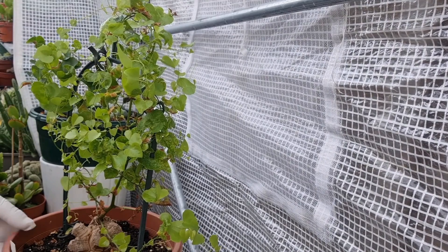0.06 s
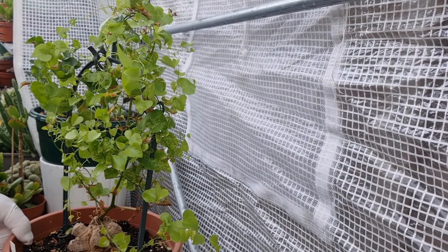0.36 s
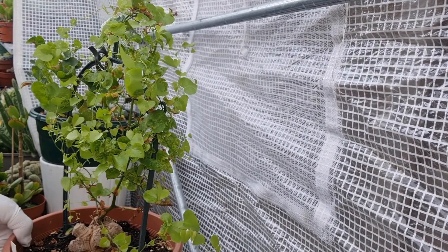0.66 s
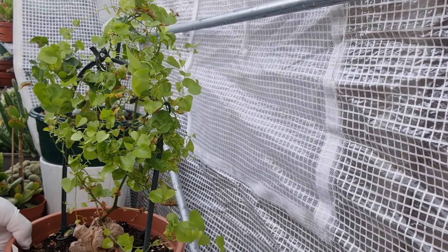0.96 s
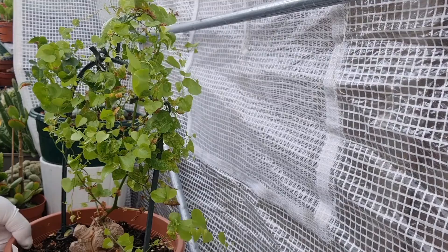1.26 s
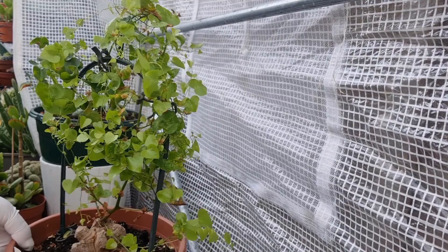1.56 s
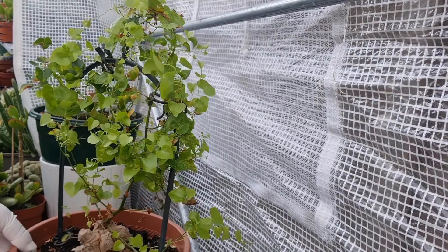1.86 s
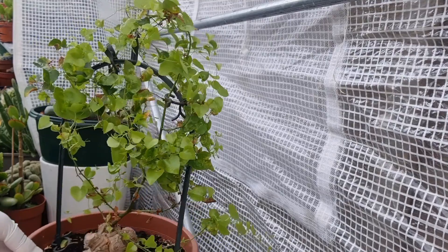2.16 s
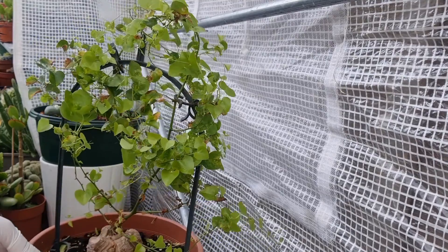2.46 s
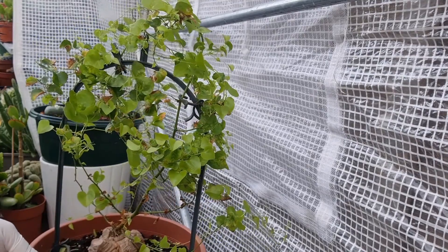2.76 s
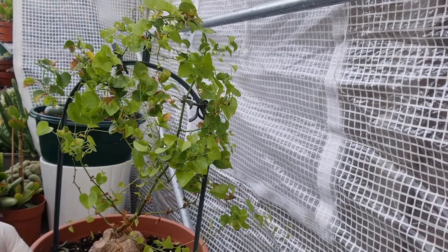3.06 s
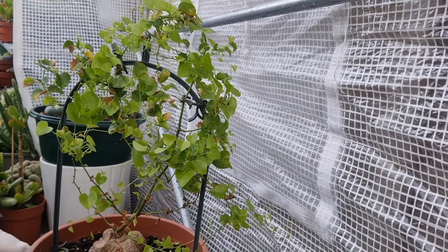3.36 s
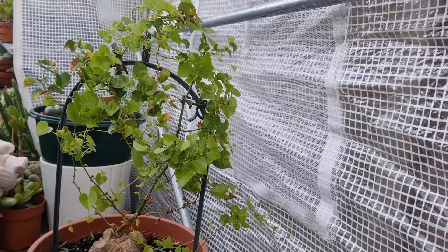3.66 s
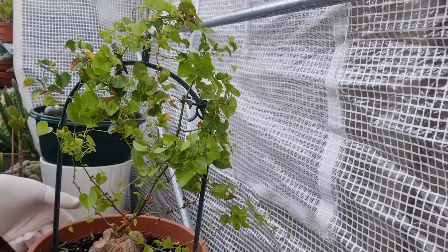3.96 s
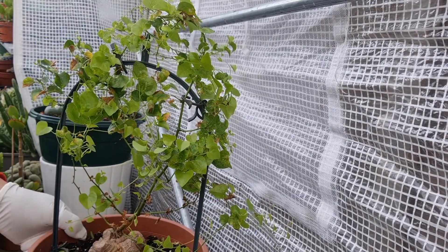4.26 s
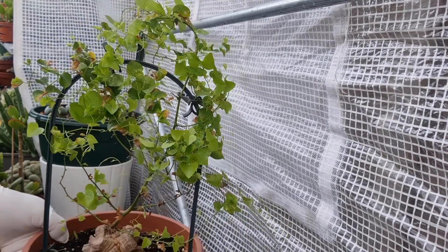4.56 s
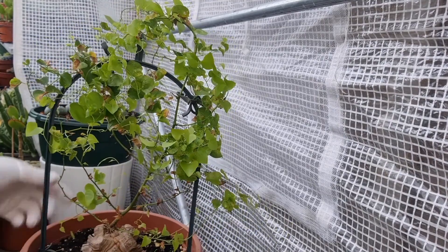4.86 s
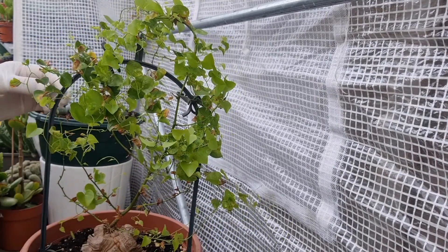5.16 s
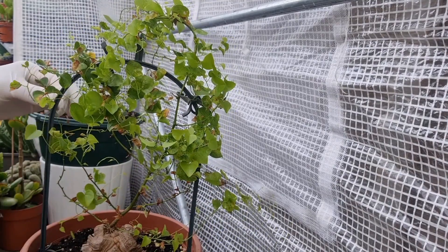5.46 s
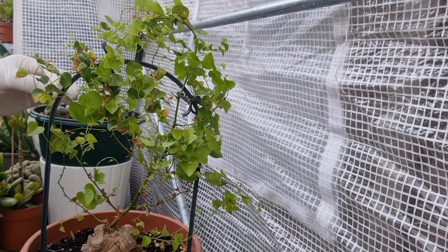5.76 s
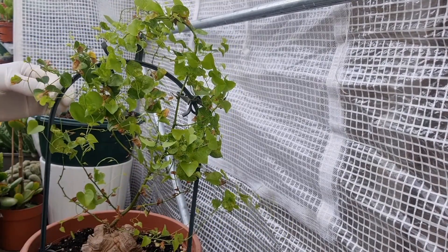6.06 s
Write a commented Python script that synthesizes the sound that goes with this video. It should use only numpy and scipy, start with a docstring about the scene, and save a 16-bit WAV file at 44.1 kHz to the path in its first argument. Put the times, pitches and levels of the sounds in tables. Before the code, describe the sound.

A low rumble of distant traffic runs throughout, with almost no echo in the small greenhouse. Close by, grit clicks at about 0.6 seconds, and a plastic plant pot gives a short, bright scrape from 0.8 to 0.9. A second scrape with small snaps comes at 1.6 seconds and continues into a duller drag. From 2.5 to 2.7 seconds grains crush under the pot in a dense crackle of sharp snaps, the loudest moment. Small jolts and faint ticks of leaves and stems follow until about 3.5 seconds. After a lull, the pot scrapes again from 4.5 seconds, ending in a sharp, gritty jolt near 4.8. From about 5.2 seconds a far engine swells into a low drone with a faint rising whine, while a few soft leaf ticks sound until the end, just after 6 seconds.

```python
"""Turning a plant pot in a greenhouse

Close by, in a small mesh greenhouse, a gloved hand turns a plastic pot in short pushes. Its base
scrapes over grit by stick-slip friction, grains snap and set its wall ringing, and leaves tick faintly.
Far traffic rumbles underneath; near the end one engine swells."""
import sys
import numpy as np
from scipy import signal
from scipy.fft import rfft, irfft, next_fast_len
from scipy.io import wavfile
from scipy.ndimage import uniform_filter1d

SR = 44100
rng = np.random.default_rng(int(sys.argv[2]) if len(sys.argv) > 2 else 0)


def bounce(signal):
    """Save signal as a 16-bit WAV file at the path given by the first command-line argument."""
    frames = np.transpose(np.atleast_2d(signal))
    limited = np.clip(frames, -1, 1)
    pcm = np.round(limited * 32767).astype(np.int16)
    wavfile.write(sys.argv[1], SR, pcm)


N = 269451
TIME = np.arange(N) / SR
FILTER_HZ, SCENE_HZ = np.fft.rfftfreq(4096, 1 / SR), np.fft.rfftfreq(N, 1 / SR)

# Resonances of the pot's wall: frequency_hz, width_hz, lift_db
WALL_MODES = [(760, 160, 4), (1060, 240, 6), (2130, 280, 9), (2790, 200, 4), (3230, 400, 4.5),
              (4000, 420, 8), (5020, 260, 9), (5400, 380, 12), (6450, 300, 6), (7330, 380, 12),
              (9150, 400, 7), (10700, 400, 4)]
# Force spectrum of a breaking grain: frequency_hz, level_db
BRITTLE_FORCE = [(80, -31.5), (250, -9.5), (1500, -11), (2300, -7), (3000, 4.5), (4550, -2), (5200, -3.5),
                 (6100, -1.5), (7350, -5.5), (8100, -2.5), (13000, -12), (16000, -23)]


def gain_of(db):
    """Decibels to amplitude ratio."""
    return 10 ** (np.asarray(db) / 20)


def unit_rms(x):
    """Normalisation to an rms of one."""
    return x / np.sqrt(np.mean(np.abs(x) ** 2) + 1e-20)


def spectrum_at(points, hz):
    """Interpolation of a spectrum on a log-frequency axis."""
    f, value = np.transpose(points)
    return np.interp(np.log(hz + 1), np.log(f + 1), value)


def follow(rows):
    """Linear interpolation of each column of a time curve at every sample."""
    times, *columns = np.transpose(rows)
    return [np.interp(TIME, times, column) for column in columns]


def add(mix, start_s, sound):
    """Superposition of a sound on the mix."""
    part = mix[round(start_s * SR):][:len(sound)]
    part += sound[:len(part)]


def wander(cutoff_hz):
    """Smooth random modulation: low-passed noise of unit rms."""
    size = next_fast_len(N, True)
    f = np.fft.rfftfreq(size, 1 / SR)
    return unit_rms(irfft(rfft(rng.standard_normal(size)) / (1 + (f / cutoff_hz) ** 4), size)[:N])


def minimum_phase(db):
    """Causal impulse response of unit energy with the given spectral shape."""
    log_gain = np.log(gain_of(np.concatenate([db, db[-2:0:-1]])))
    taps = np.fft.ifft(np.exp(np.conj(signal.hilbert(log_gain)))).real
    return taps / np.linalg.norm(taps)


def traffic_rumble():
    """Far traffic as amplitude-modulated low-frequency noise."""
    colour = [(12, -8.5), (25, -4.5), (36, -22), (47, -6.5), (62, 3), (86, -10), (120, -7.5), (138, -21.5),
              (260, -52)]  # spectrum before the low-pass: frequency_hz, level_db
    uneven_level = [(0.0, -45.5), (1.62, -52), (2.29, -46.5), (2.32, -54.5), (2.81, -47), (4.65, -48.5),
                    (4.69, -53.5), (5.12, -46), (5.15, -50)]  # uneven level of the low rumble: time_s, level_db
    spectrum = rfft(rng.standard_normal(N)) * gain_of(spectrum_at(colour, SCENE_HZ))
    rumble = unit_rms(irfft(spectrum / (1 + (SCENE_HZ / 300) ** 4), N))
    rumble /= np.sqrt(uniform_filter1d(rumble ** 2, size=8000))  # holds the running rms near one
    return rumble * gain_of(follow(uneven_level)[0])


def traffic_wash():
    """A diffuse field of soft noise: left and right lose coherence as frequency rises."""
    colour = [(94, -25), (160, -0.5), (222, -2), (333, -15.5), (388, -7.5), (427, -12), (616, -14),
              (747, -12.5), (839, -19.5), (1810, -22.5), (2330, -26.5), (3400, -31), (4300, -37.5),
              (16000, -53)]  # spectrum of the wash: frequency_hz, level_db
    likeness = [(60, 1), (240, 0.84), (950, 0), (3770, 0), (15000, 0.08)]  # left-right likeness: frequency_hz, coherence (0-1)
    swell = [(0, 2), (1.2, 0), (3.3, 2.5), (4.5, -0.3), (6.11, 3)]  # slow drift in level: time_s, gain_db
    left, independent = rfft(rng.standard_normal((2, N)))
    coherence = np.clip(spectrum_at(likeness, SCENE_HZ), 0, 1)
    right = coherence * left + np.sqrt(1 - coherence ** 2) * independent
    wash = unit_rms(irfft(np.array([left, right]) * gain_of(spectrum_at(colour, SCENE_HZ)), N))
    return wash * gain_of(-65 + follow(swell)[0] + 0.2 * wander(8))


def contact_burst(samples, length_s):
    """Broadband excitation: a brief cluster of tiny impacts, whitened and scaled to unit energy."""
    t = np.arange(samples) / SR
    spectrum = rfft(rng.standard_normal(samples) * np.exp(-(t / length_s) ** 4))
    burst = irfft(spectrum / (np.abs(spectrum) + 1e-9)) * np.exp(-(t / (2 * length_s)) ** 4)
    return burst / np.linalg.norm(burst)


def leaf_ticks():
    """Heavy damping leaves each touch of leaf, stem or glove one broad spectral hump."""
    touches = [(.109, -68, 3800), (2.888, -56, 1820), (3.027, -59, 1759), (3.351, -55, 2440),
               (3.403, -58, 2680), (3.5, -64, 5740), (4.4052, -70, 5430), (4.9524, -71, 6010),
               (5.1668, -77, 5200), (5.591, -66, 5760), (5.8876, -68.5, 8700), (5.9534, -64.5, 8800),
               (6.052, -70, 9150)]  # light contacts: start_s, relative_level_db, centre_hz
    out = np.zeros(N)
    for start_s, db, centre_hz in touches:
        octaves = np.log2((FILTER_HZ + 1) / centre_hz)
        hump_db = -36 * np.log10(1 + (octaves / .62) ** 2)
        response = minimum_phase(np.maximum(hump_db, -70))
        tick = signal.fftconvolve(contact_burst(512, length_s=0.0033), response)
        add(out, start_s, gain_of(db + 20) * tick)
    return out


def pot_response(force, modes, ring=1, tilt_db_per_octave=0):
    """Source and filter: a force spectrum lifted by resonances, which weaken when ring is below one."""
    resonance_db = ring * sum(db / (1 + (2 * (FILTER_HZ - hz) / width) ** 2) for hz, width, db in modes)
    treble_db = tilt_db_per_octave * np.log2(np.maximum(FILTER_HZ, 1500))
    return minimum_phase(spectrum_at(force, FILTER_HZ) + resonance_db + treble_db)


def grain_snaps():
    """Brittle fracture: single grains give way and excite the wall's modes."""
    breaks = [(0.6237, -47, 8.5), (0.634, -56, 5.5), (0.782, -31, 1.5), (0.795, -35, 14), (.8135, -64, 3),
              (0.8194, -32, 5.5), (0.8229, -29, 8), (0.826, -40, 21.5), (0.9213, -43, 3.5),
              (1.5658, -55, -5), (1.5991, -43.5, 11), (1.6151, -41, 7), (1.6316, -41, 16), (1.6645, -38, 8),
              (1.706, -38, 2.5), (2.0948, -34.5, 2.5), (2.177, -37, -3), (2.4064, -29.5, 3),
              (2.444, -37.5, -6), (2.4830, -36.5, -1.5), (2.5110, -11.5, 3), (2.524, -35.5, 3.5),
              (2.5437, -25.5, -4), (2.5623, -20, 10), (2.57, -20.5, 1), (2.5805, -36, 6),
              (2.622, -18.5, 2.5), (2.6304, -15, 1), (2.642, -21, 3), (2.6578, -22.5, -0.5),
              (2.6777, -18.5, 0.5), (2.689, -18.5, 0), (2.7734, -44, -7.5), (2.9692, -50, -4),
              (3.0948, -47, -6), (4.509, -46, -4.5)]  # snapping grains: start_s, relative_level_db, tilt_db_per_octave
    ringing = [(-35, .55), (-23, 1.4)]  # harder snaps ring the wall more: relative_level_db, ring_factor
    out = np.zeros(N)
    for start_s, db, tilt in breaks:
        ring = np.interp(db, *np.transpose(ringing))
        wall = pot_response(BRITTLE_FORCE, WALL_MODES, ring, tilt)
        snap = signal.fftconvolve(contact_burst(256, length_s=.0011), wall)
        add(out, start_s, gain_of(db + 14.5) * snap)
    return out


def envelope(onset_s, attack_s, hold_s, release_s):
    """Exponential rise to one at onset_s, hold and decay; 30 dB per attack or release time."""
    ramps = np.maximum(onset_s - TIME, 0) / attack_s + np.maximum(TIME - onset_s - hold_s, 0) / release_s
    return gain_of(-30 * np.minimum(ramps, 6))


def friction():
    """Incoherent strokes add in power; sharpness (0-1) divides it between dull drag and hard bite."""
    # Pushes that slide the pot:
    # onset_s, attack_s, hold_s, release_s, level_db, swell_db, start_sharpness, end_sharpness
    pushes = [(0.813, 0.051, 0.11, 0.028, -47.5, -5, 0.82, 0.79),
              (1.602, .01, .11, 0.094, -54, 8.5, 0.94, 0.94),
              (1.722, .15, 0.055, 0.44, -54.5, 0.5, 0.85, 0.04),
              (2.092, .22, 0.32, 0.68, -53.5, -0.5, 0.26, 0.08),
              (2.722, .05, 0.477, 0.087, -73.5, 3.5, 0, 0.15),
              (4.569, 0.18, 0.21, 0.028, -54.5, 2.5, 0.58, 0.46)]
    jerks = [(1.38, -78.5, .6, 0.25), (2.305, -48.5, 0.13, 0.28), (2.974, -58, 0.06, 0.063),
             (3.103, -61.5, 0.1, 0.11), (3.41, -77.5, 1, 0.47), (4.243, -70, 0.4, 0.08),
             (4.751, -44.5, 0.84, 0.04), (4.93, -76, .3, .14)]  # brief jolts of the pot: peak_s, level_db, sharpness, fade_s
    strokes = []
    for onset_s, attack_s, hold_s, release_s, db, swell_db, sharp_start, sharp_end in pushes:
        progress = np.clip((TIME - onset_s) / hold_s, 0, 1)
        force = gain_of(db + swell_db * progress) * envelope(onset_s, attack_s, hold_s, release_s)
        strokes.append((force, sharp_start + (sharp_end - sharp_start) * progress))
    for peak_s, db, sharp, fade_s in jerks:
        strokes.append((gain_of(db) * envelope(peak_s, 0.66 * fade_s, 0, fade_s), sharp))
    drag_power = sum(force ** 2 * (1 - sharp) for force, sharp in strokes)
    bite_power = sum(force ** 2 * sharp for force, sharp in strokes)
    return np.sqrt(drag_power), np.sqrt(bite_power)


def slips(per_s, spread_db):
    """Stick-slip releases as a Poisson train of impulses of uneven size."""
    size = gain_of(spread_db * np.minimum(rng.exponential(1, N), 4))
    return unit_rms(size * rng.choice([-1, 1], N) * (rng.random(N) < per_s / SR))


def base_scrape():
    """Stick-slip friction: the base judders over grit, exciting resonances of wall and rim."""
    dull_force = [(80, -20.5), (240, 4), (700, -0.5), (1500, -7.5), (2200, -2), (3300, 0.5), (4200, -3),
                  (5400, -9.5), (7300, -11.5), (9500, -21), (13000, -15.5), (16000, -24.5)]  # force spectrum of dragging: frequency_hz, level_db
    sharp_force = [(80, -38), (1500, -10.5), (2500, -11.5), (3300, 3), (4700, -8.5), (6500, 3.5),
                   (8000, -3), (10000, -7), (13000, -6.5), (16000, -15.5)]  # force spectrum of biting grit: frequency_hz, level_db
    rim_modes = [(3750, 1200, 8.5), (6000, 150, 3.5), (6160, 400, 0.5), (7000, 360, 4), (7965, 260, 6),
                 (8360, 740, 5.5), (9100, 400, 4.5), (12100, 280, 11.5)]  # hard grit singing against the rim: frequency_hz, width_hz, lift_db
    fine_grit = [(.85, 0.4), (1.65, 0.4), (4.6, 0.2)]  # hissing grit, wearing off as the pot turns: time_s, power_share
    drag_force, bite_force = friction()
    judder = gain_of(1.3 * wander(60.5))
    drag_slips = judder * drag_force * slips(per_s=9000, spread_db=4)
    bite_slips = judder * bite_force * slips(per_s=2400, spread_db=2)
    drag = signal.oaconvolve(drag_slips, pot_response(dull_force, WALL_MODES, ring=0.79))[:N]
    bite = signal.oaconvolve(bite_slips, pot_response(sharp_force, rim_modes))[:N]
    coarse = signal.sosfiltfilt(signal.butter(4, 8800, fs=SR, output="sos"), bite)
    hiss = np.sqrt(follow(fine_grit)[0]) * (bite - coarse)  # only fine grit reaches the top octave
    return drag + coarse + hiss


def grit_crush():
    """Fracture under load: grains crushed beneath the rim merge into a crackle."""
    crushes = [(2.507, 0.088, -39), (2.62, 0.045, -37.5), (2.684, .017, -48)]  # spells of crushing: onset_s, hold_s, level_db
    pressure = sum(gain_of(db) * envelope(onset_s, attack_s=.01, hold_s=hold_s, release_s=.018)
                   for onset_s, hold_s, db in crushes)
    wall = pot_response(BRITTLE_FORCE, WALL_MODES, ring=0.93)
    return signal.oaconvolve(pressure * slips(per_s=4000, spread_db=1.5), wall)[:N]


def far_engine():
    """Periodic firing gives a harmonic drone as an engine pulls away with a faint rising whine."""
    firing = [(5.1, 48.68, -69.5), (5.25, 45.34, -50), (5.34, 55.8, -45), (5.55, 56.72, -41.5),
              (5.62, 53.8, -47), (5.82, 52.37, -40), (5.95, 52.84, -44), (6.11, 50.83, -50)]  # engine speed and loudness: time_s, firing_hz, level_db
    orders = [(1, 2), (2, -5.5), (3, -26.5)]  # harmonics of the firing rate: order, gain_db
    whine_path = [(5.1, 400, -100), (5.22, 430, -73.5), (5.38, 599, -76), (5.75, 716, -73.5),
                  (6.11, 668, -97)]  # glide of the whine: time_s, pitch_hz, level_db
    firing_hz, level_db = follow(firing)
    cycles = np.cumsum(firing_hz * (1 + 0.0049 * wander(8))) / SR
    drone = sum(gain_of(db + 0.68 * wander(5.6)) * np.sin(2 * np.pi * (order * cycles + rng.random()))
                for order, db in orders)
    whine_hz, whine_db = follow(whine_path)
    carrier = np.exp(2j * np.pi * np.cumsum(whine_hz) / SR)
    whine = unit_rms(((wander(60) + 1j * wander(51)) * carrier).real)  # narrow-band noise
    return gain_of(level_db) * drone + gain_of(whine_db) * whine


def reflections(t60_s, delay_s):
    """Exponential decay of sparse echoes with random sign and unit total energy."""
    t = np.arange(6000) / SR
    arrivals = rng.choice([-1, 1], len(t)) * (rng.random(len(t)) < 5000 / SR)
    taps = arrivals * (t > delay_s) * gain_of(-60 * t / t60_s)
    return taps / np.linalg.norm(taps)


def greenhouse(source, direct_db, near_db, tail_db):
    """Multipath to two microphones: direct sound, near pots and shelves, the soft walls' short tail."""
    phase_difference = [(1200, -.2), (2100, .9), (3100, 2.6), (4300, 3.6), (4900, 6.0), (5450, 6.9),
                        (7300, 4.1), (9500, 4.8), (11400, 6.1), (13200, 8.5)]  # between the microphones: frequency_hz, left_lead_rad
    level_difference = [(300, -2.5), (2000, -2), (4300, -3), (5100, -4), (6000, -2.5), (9000, -2.5),
                        (16000, -0.5)]  # between the microphones: frequency_hz, left_minus_right_db
    lead = np.exp(.5j * spectrum_at(phase_difference, FILTER_HZ))
    left_response = lead * gain_of(spectrum_at(level_difference, FILTER_HZ) / 2)
    renewal_hz = 4.7  # three echo patterns cross-fade as the pot turns
    shares = np.sqrt(2 / 3) * np.cos(np.pi * (renewal_hz * TIME + np.arange(3)[:, None] / 3))
    channels = []
    for response in (left_response, 1 / left_response):
        direct = signal.oaconvolve(source, np.fft.fftshift(irfft(response)), "same")
        heard = gain_of(direct_db) * direct
        for share in shares:
            near = gain_of(near_db) * reflections(t60_s=.014, delay_s=.0003)
            tail = gain_of(tail_db) * reflections(t60_s=.125, delay_s=.003)
            heard += signal.oaconvolve(share * direct, near + tail)[:N]
        channels.append(heard)
    return np.array(channels)


def scene():
    """Superposition of pot, plant and far street; a scrape spreads from the rim, a snap from one spot."""
    rubbing = greenhouse(base_scrape() + grit_crush(), direct_db=-5, near_db=-1.5, tail_db=-10)
    clicks = greenhouse(grain_snaps() + leaf_ticks(), direct_db=-2.5, near_db=-4.5, tail_db=-10)
    rumble, wash = traffic_rumble(), traffic_wash()
    sides = np.array([[1], [-1]])
    mismatch = gain_of(0.57 * sides) * np.exp(.13j * sides)  # the microphones differ slightly in the bass
    bass = (signal.hilbert(rumble + far_engine()) * mismatch).real
    return rubbing + clicks + bass + wash


def record(dry):
    """Band limiting by a steep linear-phase low-pass filter."""
    lowpass = signal.firwin(511, 15950, window=("kaiser", 9), fs=SR)
    return signal.oaconvolve(dry, lowpass[None], "same")


dry = scene()
out = record(dry)
bounce(out)
```